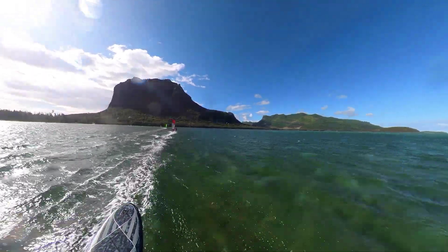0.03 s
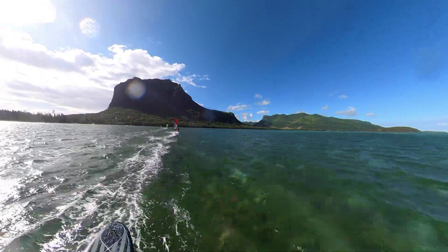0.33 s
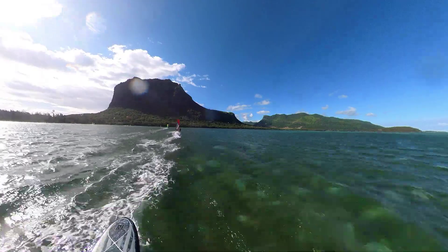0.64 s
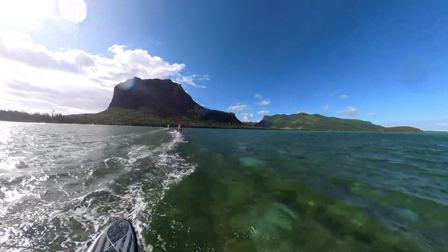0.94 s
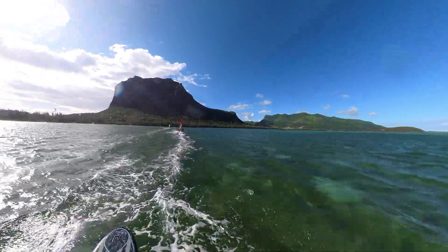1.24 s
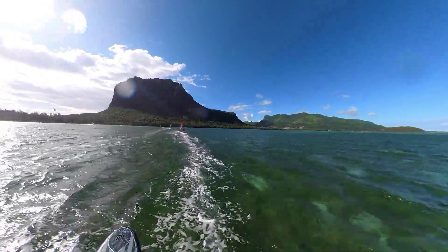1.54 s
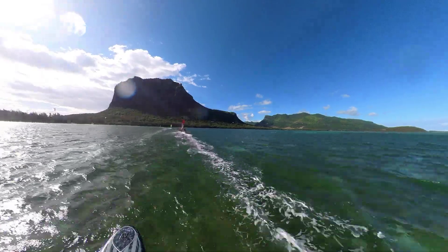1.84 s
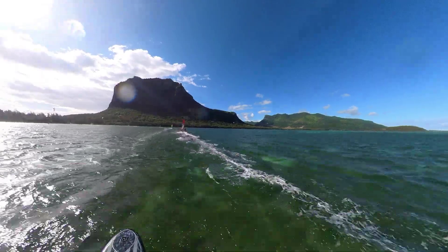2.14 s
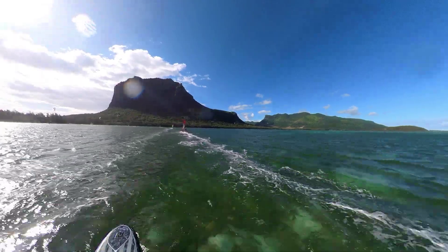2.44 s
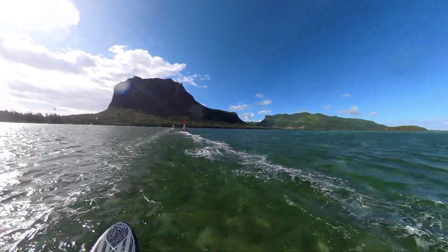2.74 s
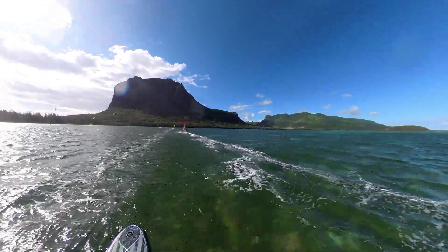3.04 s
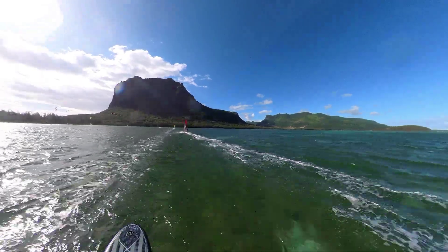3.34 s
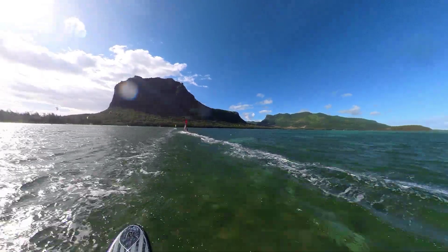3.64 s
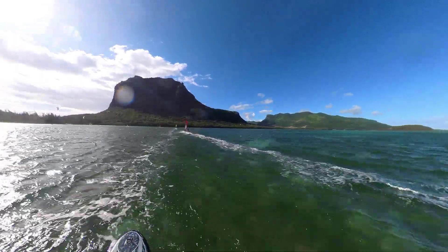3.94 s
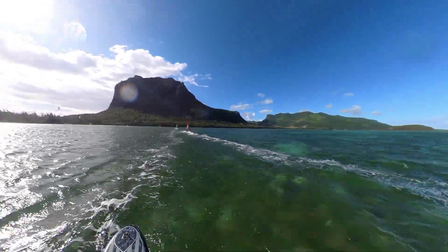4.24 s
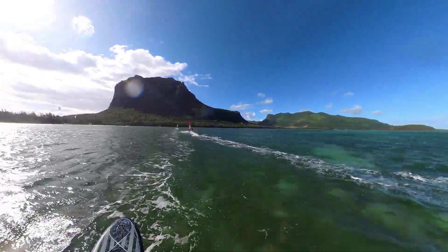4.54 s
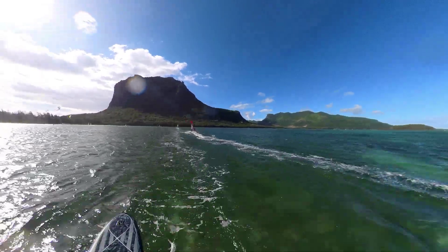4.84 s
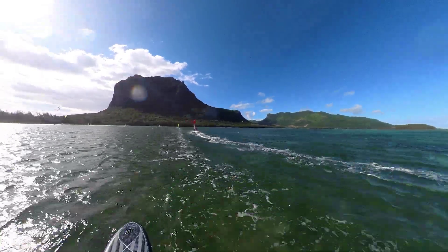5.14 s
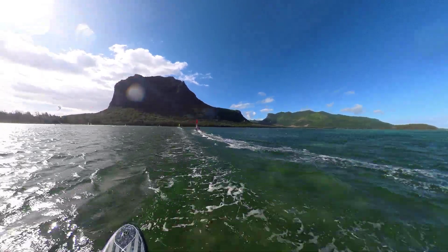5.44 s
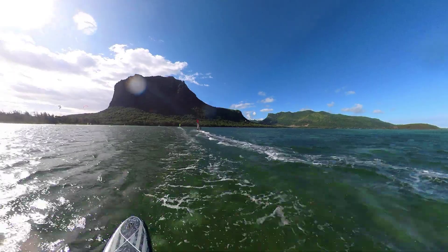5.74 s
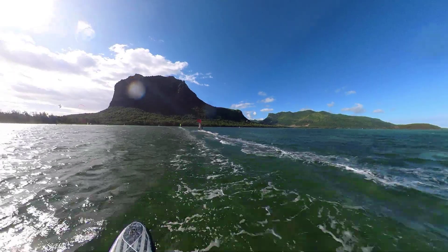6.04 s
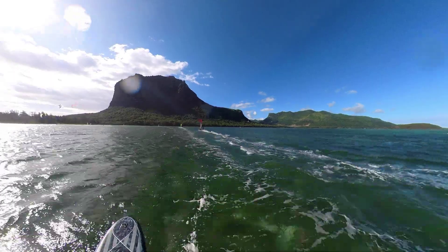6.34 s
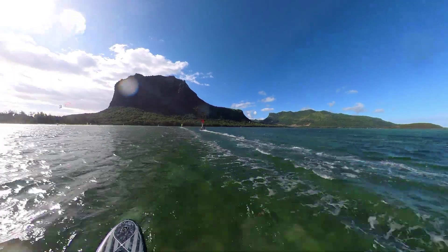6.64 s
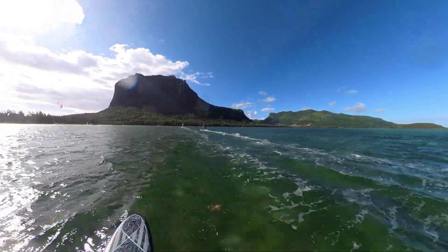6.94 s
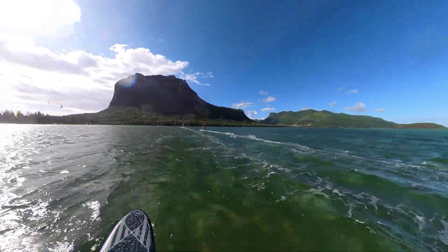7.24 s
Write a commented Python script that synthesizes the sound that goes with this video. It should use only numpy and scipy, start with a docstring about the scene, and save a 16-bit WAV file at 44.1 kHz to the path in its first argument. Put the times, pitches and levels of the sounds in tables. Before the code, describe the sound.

A board speeds across a choppy lagoon, heard from a small waterproof camera riding with it. Turbulent wind rumbles on the microphone throughout and water rushes along the edges. Chop slaps and thumps the board several times a second in short, rough bursts. Whenever the board skips, the rush dips briefly and a deep throb comes through. Faint spray sizzles and ticks behind it, muffled and without echo.

```python
"""Board planing over a choppy lagoon.

Heard from a small waterproof camera riding with it. Turbulent wind rumbles on the microphone and
water rushes along the rails. Chop thumps, slaps and smacks the board in short rough bursts. When
the board skips, the rush drops away and a deep throb shakes the camera. Spray sizzles, spurts and
ticks behind it all, muffled by the sealed port."""
import sys
import numpy as np
from scipy import signal
from scipy.fft import rfft, irfft, next_fast_len
from scipy.io import wavfile
from scipy.ndimage import uniform_filter1d, map_coordinates

SR = 44100
rng = np.random.default_rng(int(sys.argv[2]) if len(sys.argv) > 2 else 0)


def unload_audio(sound):
    """Save the sound as a 16-bit wav file, at the path given as the first command line argument."""
    columns = np.transpose(np.atleast_2d(sound))
    # keep every value between -1 and 1, then stretch to whole-number steps
    steps = np.round(np.clip(columns, -1, 1) * 32767)
    wavfile.write(sys.argv[1], SR, steps.astype(np.int16))


N = 321930
TIME_S = np.arange(N) / SR

# Noise spectra. Each row: frequency in Hz, relative gain in dB.
RUMBLE_SPECTRUM = [(15, -42.5), (27, -10.5), (42, 4.5), (60, 3.5), (100, 2.5), (160, -1), (220, -10),
                   (400, -42)]
KNOCK_SPECTRUM = [(60, -25.5), (120, -11), (190, 9), (270, -2), (400, -7.5), (900, -44.5)]
FLUTTER_SPECTRUM = [(100, -24.5), (190, 2.5), (260, 2), (400, -6.5), (500, -13), (610, -14), (720, -24),
                    (900, -24), (1500, -56.5)]
RUSH_SPECTRUM = [(200, 2), (480, 10), (850, 8.5), (1250, 3), (1550, -2), (2000, -4.5), (3000, -25),
                 (4500, -17.5), (8000, -13.5)]
SPRAY_SPECTRUM = [(1000, -5), (2200, 0), (3500, -4), (5000, 3), (7300, 3), (9000, 3), (12000, 1.5)]
SPLASH_SPECTRUM = [(250, -7), (450, 12.5), (750, 14), (1000, 5.5), (1300, 2), (2000, -2), (3000, -12),
                   (4500, -9.5), (8000, -38)]
TICK_SPECTRUM = [(1000, -17), (2600, -8), (4000, -4.5), (6300, 3), (9000, 5.5), (12000, -5.5)]
SWISH_SPECTRUM = [(500, -21.5), (1400, 6.5), (2400, -0.5), (3300, -5.5), (4500, -0.5), (7000, -17.5)]
# Wind rumble on the microphone. Each row: time in seconds, base level in dB.
RUMBLE_LEVELS = [(0, -22.5), (0.9, -23.5), (1.15, -20), (1.45, -22.5), (1.7, -20), (2.3, -25), (2.7, -20.5),
                 (3.25, -26.5), (3.6, -21), (4.5, -24.5), (4.85, -21.5), (5.05, -21.5), (5.6, -25),
                 (6.1, -22.5), (7.3, -23)]
# Spray off the board. Each row: time in seconds, base level in dB.
SPRAY_LEVELS = [(0, -55), (0.38, -51), (0.57, -41.5), (.76, -45.5), (1.07, -47), (1.28, -51), (1.95, -44),
                (2.3, -46.5), (2.7, -43), (3, -49.5), (3.37, -42), (3.5, -54), (3.87, -42.5), (4.2, -48),
                (4.6, -41.5), (5.05, -45), (5.22, -43.5), (5.28, -45.5), (5.5, -42.5), (5.65, -44),
                (5.85, -44), (6.17, -48.5), (6.55, -44), (6.8, -47), (7.05, -45.5), (7.3, -46.5)]
# Board running light. Each row: centre and half-width in seconds, wind drop and water drop in dB.
LIGHT_RUNS = [(.09, 0.044, 4.5, 6.5), (.33, 0.019, 0.5, 3), (.745, 0.036, -0.5, 2.5), (1.32, .05, 3.5, 4.5),
              (1.51, 0.13, 8, 7.5), (1.63, 0.028, -3.5, 4), (1.8, 0.025, 2.5, 5), (1.93, 0.1, 3, 6.5),
              (2.21, 0.072, 9, 10), (2.48, 0.077, 7, 6.5), (2.8, 0.04, 7.5, 4.5), (2.94, 0.024, 8.5, 7),
              (3.06, 0.037, -1, 12), (3.15, 0.021, 0, 7), (3.33, .04, 3.5, 5), (3.6, 0.071, 4.5, 7.5),
              (3.73, 0.025, 4, 10.5), (3.94, 0.03, 5, 9), (4.18, 0.047, 7.5, 4), (4.3, 0.037, 1.5, 8),
              (4.769, 0.075, 2, 5.5), (5, 0.052, 15.5, 11.5), (5.08, 0.042, 11.5, 10),
              (5.32, 0.1, 6.5, 4.5), (5.73, 0.078, 9.5, 5.5), (5.98, 0.03, 0, 7), (6.45, 0.059, 5.5, 3),
              (6.78, 0.11, 2, 3.5), (7.27, 0.062, 0.5, 1.5)]
# Hull hitting a wave. Each row: time in seconds, pitch in Hz, peak in dB.
HULL_THUMPS = [(0.046, 170, -8.5), (.17, 175, -12), (1.1, 197, -16.5), (2.33, 221, -12), (3.451, 186, -7.5),
               (3.544, 200, -16), (3.598, 170, -11), (2.1, 200, -17.5), (3.799, 171, -22.5),
               (4.386, 192, -13.5), (4.647, 196, -9.5), (5.176, 200, -11), (6.945, 196, -11)]
# Chop on the board. Each row: crest and length in seconds, pitch in Hz, body and splash in dB.
CHOP_SLAPS = [(0.055, .02, 192, -21, -51), (0.151, 0.014, 190, -21.5, -38),
              (0.201, 0.0084, 273, -20.5, -31.5), (0.285, 0.012, 450, -25.5, -30),
              (0.366, 0.008, 380, -22.5, -32), (0.421, 0.024, 288, -32, -33.5),
              (0.491, .02, 470, -31.5, -36), (0.518, 0.038, 290, -40, -36), (0.6, 0.064, 330, -29, -31.5),
              (0.691, 0.012, 410, -21, -40), (0.79, 0.021, 400, -27.5, -29.5),
              (0.961, 0.029, 215, -23.5, -29.5), (1.055, 0.049, 247, -27, -42),
              (1.077, 0.0082, 475, -27, -44), (1.167, 0.045, 288, -25.5, -40.5),
              (1.219, 0.024, 328, -27.5, -31.5), (1.405, 0.048, 262, -21.5, -33.5),
              (1.742, 0.036, 207, -23, -30), (1.852, 0.026, 433, -27, -34.5),
              (1.938, 0.017, 300, -33, -32.5), (2, 0.0084, 600, -26, -33),
              (2.013, 0.014, 242, -19.5, -27.5), (2.072, 0.027, 244, -22.5, -41),
              (2.097, 0.016, 304, -19, -28.5), (2.26, 0.018, 298, -26.5, -38.5),
              (2.319, 0.016, 239, -17, -32), (2.346, 0.022, 241, -17, -31),
              (2.404, 0.011, 250, -19.5, -34.5), (2.552, 0.023, 448, -43, -31.5),
              (2.617, 0.015, 224, -21.5, -35), (2.651, 0.021, 360, -25.5, -32.5),
              (2.692, 0.011, 530, -22, -27), (2.869, 0.014, 408, -22, -26), (2.893, 0.023, 430, -30, -32.5),
              (2.981, 0.008, 517, -29.5, -40), (2.998, 0.018, 200, -28, -33),
              (3.099, 0.008, 270, -24.5, -31.5), (3.118, 0.005, 284, -21, -38),
              (3.215, 0.01, 523, -18.5, -32), (3.248, 0.031, 283, -23, -30.5),
              (3.453, .012, 260, -21.5, -35.5), (3.496, 0.026, 420, -38, -42.5),
              (3.538, .013, 225, -23.5, -35.5), (3.6, 0.02, 211, -28, -36), (3.671, 0.018, 258, -19, -32),
              (3.786, 0.023, 217, -19, -48), (3.846, 0.0093, 302, -16, -35),
              (3.866, 0.035, 313, -29.5, -29.5), (4.015, 0.023, 206, -27.5, -39),
              (4.091, 0.014, 495, -19, -38.5), (4.122, 0.032, 450, -43, -36.5),
              (4.219, 0.014, 218, -28.5, -31), (4.382, 0.011, 260, -19.5, -31.5),
              (4.395, 0.026, 340, -19.5, -34), (4.455, .014, 258, -33, -30.5),
              (4.647, 0.015, 277, -13, -30), (4.675, 0.024, 219, -38, -34), (4.864, 0.034, 195, -19.5, -32),
              (4.917, 0.0095, 453, -17, -37), (4.938, 0.013, 213, -15.5, -31.5),
              (5.17, 0.011, 436, -17.5, -25.5), (5.194, 0.023, 242, -30, -33),
              (5.238, 0.022, 355, -39, -36.5), (5.304, 0.017, 450, -36, -35), (5.387, .029, 326, -28, -31),
              (5.457, 0.034, 480, -32, -30.5), (5.563, 0.016, 232, -33, -30), (5.64, 0.024, 292, -17, -32),
              (5.684, 0.019, 250, -45, -32.5), (5.844, 0.0068, 326, -20, -39),
              (5.879, 0.023, 450, -31, -38), (5.913, 0.019, 400, -21, -35),
              (6.004, 0.0073, 268, -26.5, -32.5), (6.031, 0.019, 388, -16.5, -30.5),
              (6.062, .02, 416, -43, -31), (6.174, 0.037, 300, -27, -39), (6.277, .025, 279, -27.5, -37.5),
              (6.33, 0.0062, 450, -25.5, -41), (6.347, 0.04, 288, -21.5, -33),
              (6.371, 0.0083, 495, -18.5, -34), (6.504, 0.0098, 300, -43, -37),
              (6.603, 0.024, 251, -19.5, -36), (6.653, 0.014, 390, -21, -31.5),
              (6.67, 0.028, 292, -22, -29.5), (6.946, 0.014, 258, -20.5, -29.5),
              (6.967, 0.012, 404, -34.5, -32.5), (7.021, 0.016, 227, -23, -34.5),
              (7.113, 0.026, 298, -26, -27), (7.162, 0.03, 325, -27.5, -34),
              (7.211, 0.013, 240, -24.5, -35)]
# Skips off the chop. Each row: crest of the throb in seconds, peak in dB.
BOARD_SKIPS = [(0.079, -22), (.335, -24), (0.714, -22), (1.28, -15.5), (1.499, -15.5), (2.159, -17.5),
               (2.438, -21.5), (2.778, -19.5), (2.927, -17.5), (3.116, -33.5), (3.601, -31), (3.909, -31),
               (4.154, -18), (4.256, -19.5), (4.479, -23.5), (4.738, -22.5), (4.986, -17.5), (5.222, -16.5),
               (5.713, -16.5), (6.134, -20), (6.416, -19.5), (6.742, -16.5), (7.206, -26)]
# Single drops on the camera. Each row: time in seconds, level at the crest in dB.
DROP_TICKS = [(.099, -31), (.344, -36), (.46, -36), (.532, -33), (0.839, -29.5), (1.256, -44), (1.411, -34),
              (1.832, -32), (2.403, -35), (2.567, -28), (2.874, -30), (3.005, -28.5), (3.118, -40),
              (3.872, -36), (4.145, -36), (4.564, -25.5), (5.021, -35), (5.101, -25.5), (5.171, -33),
              (5.318, -33), (5.689, -36), (6.867, -34), (7.099, -28), (7.126, -30), (7.229, -37),
              (7.267, -29.5)]
# Flings of spray. Each row: centre and half-width in seconds, swish and fizz in dB.
SPRAY_SPURTS = [(.211, 0.012, -35.5, -39), (.252, 0.0043, -41, -45), (.425, 0.0068, -40, -41),
                (.533, 0.0061, -42, -36), (.619, 0.0082, -40, -37), (.668, 0.012, -42.5, -37),
                (0.842, 0.0096, -41, -39), (.94, 0.027, -52, -36.5), (1.041, 0.014, -42, -38),
                (1.075, 0.022, -38, -33), (1.478, 0.021, -45.5, -47), (1.55, 0.068, -55, -49),
                (2.011, 0.011, -51, -33.5), (2.566, 0.011, -43, -34.5), (2.622, 0.0089, -47, -50),
                (2.692, 0.023, -42, -37), (2.755, 0.0093, -39.5, -41), (2.876, 0.0074, -44, -39),
                (3.207, 0.0019, -29, -40), (3.275, 0.016, -40.5, -46), (3.873, 0.0099, -40, -39),
                (4.383, 0.03, -42, -34.5), (4.585, 0.035, -42.5, -41), (4.684, 0.017, -33.5, -33.5),
                (4.785, .005, -56, -36), (4.88, 0.011, -50, -36.5), (5.005, 0.016, -50, -52),
                (5.099, .005, -46, -39), (5.171, 0.0097, -34.5, -34.5), (5.465, 0.014, -53, -37),
                (5.69, .004, -45, -45), (6.055, 0.017, -46, -35), (6.385, 0.017, -40, -45),
                (6.575, 0.018, -46, -39), (6.61, 0.01, -37.5, -37), (6.643, 0.0099, -45, -36),
                (6.675, 0.036, -40, -41), (6.865, 0.0091, -36, -33), (7.225, 0.0083, -42, -36)]
# Smacks of flat water. Each row: time in seconds, centre pitch in Hz, first crack's peak in dB.
WATER_SMACKS = [(0.286, 1236, -25), (.532, 1800, -26), (.62, 1600, -26.5), (.693, 1000, -25),
                (1.223, 1155, -19), (1.859, 1000, -26.5), (2.002, 800, -22), (2.013, 1200, -21),
                (2.099, 1000, -31.5), (2.327, 980, -18.5), (2.565, 1080, -20), (2.686, 1230, -18),
                (2.694, 1100, -28), (2.872, 1150, -20), (3.003, 1200, -25), (3.103, 1180, -16.5),
                (3.211, 1100, -30), (3.861, 1420, -18.5), (4.094, 850, -26.5), (4.386, 1206, -21),
                (4.397, 1125, -19.5), (4.452, 1124, -22), (4.883, 1020, -21), (4.924, 1193, -13),
                (5.172, 1197, -31), (5.474, 1027, -24), (6.035, 1303, -18), (6.349, 1400, -23),
                (6.656, 1100, -22), (6.667, 1410, -20), (7.114, 1100, -18)]
# Camera housing resonances. Each row: frequency in Hz, bandwidth in Hz, gain in dB.
HOUSING_MODES = [(253, 55, -16), (505.5, 91, -4), (713, 140, -9.5), (1320, 260, -16)]
# Treble loss through the sealed port. Each row: frequency in Hz, gain in dB.
PORT_RESPONSE = [(10, -0.5), (2600, -4.5), (3300, -10), (3900, -19), (4400, -29.5), (4850, -32),
                 (5400, -27), (6200, -15), (7000, -10), (7700, -11), (8400, -20), (9000, -34)]


def undb(db):
    """Decibels to gain."""
    return 10 ** (np.asarray(db) / 20)


def unit(x):
    """Scale to rms 1."""
    return x / np.sqrt(np.mean(x ** 2) + 1e-18)


def colour(x, spectrum):
    """Filter by (Hz, dB) points."""
    hz, db = np.transpose(spectrum)
    size = next_fast_len(len(x))
    bins_hz = np.maximum(np.fft.rfftfreq(size, 1 / SR), 1)
    gain = undb(np.interp(np.log(bins_hz), np.log(hz), db))
    return irfft(rfft(x, size) * gain, size)[:len(x)]


def noise(spectrum):
    """Coloured noise, rms 1."""
    return unit(colour(rng.standard_normal(N), spectrum))


def walk(rate_hz):
    """Smooth random drift, rms 1."""
    knots = rng.standard_normal(N // 16)
    return unit(map_coordinates(knots, [TIME_S * rate_hz], order=2, mode="wrap"))


def steady(x, span_s):
    """Level out swells slower than span_s."""
    size = max(int(span_s * SR), 1)
    power = uniform_filter1d(uniform_filter1d(x ** 2, size), size)
    return x / np.sqrt(power + 1e-9)


def impacts(per_s):
    """Impulses of random time and size."""
    return (rng.random(N) < per_s / SR) * rng.standard_normal(N)


def spatter(spectrum, per_s):
    """Coloured patter of drops, rms 1."""
    return unit(colour(impacts(per_s), spectrum))


def curve(points):
    """Join (seconds, value) points linearly."""
    return np.interp(TIME_S, *np.transpose(points))


def bump(at_s, half_width_s):
    """Gaussian swell, height 1."""
    out = np.zeros(N)
    near = slice(*np.searchsorted(TIME_S, [at_s - 4 * half_width_s, at_s + 4 * half_width_s]))
    out[near] = np.exp(-((TIME_S[near] - at_s) / half_width_s) ** 2)
    return out


def window(at_s, before_s, after_s):
    """Slice around an event, and its samples' ages."""
    near = slice(max(int((at_s - before_s) * SR), 0), int((at_s + after_s) * SR))
    return near, TIME_S[near] - at_s


def strike(at_s, rise_s, fade_s):
    """Slice, ages and envelope of a blow: Gaussian rise, exponential decay."""
    near, age_s = window(at_s, 0.02, 0.06)
    return near, age_s, np.exp(-np.where(age_s < 0, (age_s / rise_s) ** 2 / 2, age_s / fade_s))


def lulls():
    """Drop of wind and of water, in dB, while the board runs light."""
    wind_db = sum(db * bump(at_s, half_width_s) for at_s, half_width_s, db, _ in LIGHT_RUNS)
    water_db = sum(db * bump(at_s, half_width_s) for at_s, half_width_s, _, db in LIGHT_RUNS)
    return wind_db, water_db


def wind(lull_db, flutter_base_db=-27.5, knock_relative_db=-7, rumble_lull_share=0.55):
    """Large eddies rumble, single ones knock, small ones flutter. All surge, and sink in a lull."""
    puffs = walk(rate_hz=65)
    rumble_db = curve(RUMBLE_LEVELS) + 1.37 * walk(rate_hz=13) - rumble_lull_share * lull_db
    rumble = steady(noise(RUMBLE_SPECTRUM) * undb(1.4 * puffs), span_s=0.1)
    knocks = unit(colour(np.tanh(impacts(per_s=45)), KNOCK_SPECTRUM))
    flutter = steady(noise(FLUTTER_SPECTRUM) * undb(2.2 * puffs + 2.1 * walk(rate_hz=310)), span_s=0.02)
    flutter_db = flutter_base_db + 1.83 * walk(rate_hz=19) - lull_db
    return rumble * undb(rumble_db) + (flutter + undb(knock_relative_db) * knocks) * undb(flutter_db)


def rush(lull_db, base_db=-37):
    """Water tears along the rails, thinner in a lull."""
    flow = noise(RUSH_SPECTRUM)
    rough_db = 2.0 * walk(rate_hz=58) + 1.4 * walk(rate_hz=310)
    return steady(flow * undb(rough_db), span_s=0.052) * undb(base_db - lull_db)


def spray(lull_db, mist_gain_db=2.0, patter_gain_db=-0.5, lull_share=0.41, thrown_relative_db=-14):
    """Mist hisses, uneven droplets patter. Each slap throws up more; a lull thins it."""
    running = undb(curve(SPRAY_LEVELS) - lull_share * lull_db)
    thrown = sum(undb(splash_db + thrown_relative_db) * bump(at_s + length_s / 4, half_width_s=0.012)
                 for at_s, length_s, _, _, splash_db in CHOP_SLAPS)
    mist = noise(SPRAY_SPECTRUM) * undb(1.3 * walk(rate_hz=63) + 1.6 * walk(rate_hz=180))
    droplets = impacts(per_s=900) * undb(3 * walk(rate_hz=400))
    patter = steady(colour(droplets, SPRAY_SPECTRUM), span_s=0.049)
    return np.hypot(running, thrown) * (undb(mist_gain_db) * mist + undb(patter_gain_db) * patter)


def thumps(sag_per_s=6):
    """The hull swings two or three cycles, sagging in pitch as it settles into the water."""
    out = np.zeros(N)
    for (at_s, hz, db), phase in zip(HULL_THUMPS, rng.random(len(HULL_THUMPS))):
        near, age_s, envelope = strike(at_s, rise_s=0.0019, fade_s=0.0055)
        cycles = hz * age_s * (1 - sag_per_s * age_s / 2) + phase
        out[near] += undb(db) * envelope * np.sin(2 * np.pi * cycles)
    return out


def slaps(pocket_q=1.78, rise_share=0.23, fade_share=0.68, crack_gain=0.18, crack_s=0.00098):
    """Chop traps an air pocket that rings briefly, under a torn splash that cracks at the crest."""
    out = np.zeros(N)
    water = steady(spatter(SPLASH_SPECTRUM, per_s=2400), span_s=0.0057) * undb(1.1 * walk(rate_hz=960))
    push = rng.standard_normal(N)
    for at_s, length_s, hz, body_db, splash_db in CHOP_SLAPS:
        near, age_s = window(at_s, 2 * length_s, 4 * length_s)
        lengths = np.abs(age_s) / length_s
        decay = np.where(age_s < 0, (lengths / rise_share) ** 2, (lengths / fade_share) ** 1.88)
        envelope = np.exp(-decay / 2)
        pocket = signal.iirpeak(hz, pocket_q, fs=SR)
        ring = steady(signal.lfilter(*pocket, signal.lfilter(*pocket, push[near])), span_s=0.008)
        crack = 1 + crack_gain * np.exp(-np.abs(age_s) / crack_s)
        body = unit(ring * envelope) * undb(body_db)
        splash = unit(water[near] * envelope * crack) * undb(splash_db)
        out[near] += np.sqrt(length_s * SR / len(age_s)) * (body + splash)  # rms over length_s
    return out


def throbs(pitch_hz=43.6, rise_s=0.054, fade_s=0.063):
    """Each skip sets off a few slow, uneven pressure swings that swell and die."""
    out = np.zeros(N)
    wobble_s = np.cumsum(0.0927 * walk(rate_hz=40)) / SR
    for (at_s, db), phase in zip(BOARD_SKIPS, rng.random(len(BOARD_SKIPS))):
        near, age_s = window(at_s, 0.1, 0.3)
        envelope = np.exp(-np.where(age_s < 0, (age_s / rise_s) ** 2 / 2, (age_s / fade_s) ** 2))
        cycles = pitch_hz * (age_s + wobble_s[near]) + phase
        out[near] += undb(db) * envelope * np.sin(2 * np.pi * cycles)
    return out


def ticks():
    """Single drops burst crisply on the housing."""
    gain = np.zeros(N)
    for at_s, db in DROP_TICKS:
        near, _, envelope = strike(at_s, rise_s=0.0003, fade_s=0.0022)
        gain[near] += undb(db) * envelope
    return gain * steady(noise(TICK_SPECTRUM), span_s=0.001)


def spurts():
    """Flung spray: a ragged swish of water, a bright fizz of drops on the camera."""
    swish = spatter(SWISH_SPECTRUM, per_s=1100)
    fizz = unit(noise(SPRAY_SPECTRUM) * undb(walk(rate_hz=780)))
    return sum(bump(at_s, half_width_s) * (undb(swish_db) * swish + undb(fizz_db) * fizz)
               for at_s, half_width_s, swish_db, fizz_db in SPRAY_SPURTS)


def smacks(crack_count=4, gap_s=0.0034, scatter_octaves=0.14, step_db=-5.0):
    """A small air pocket tears shut in a run of one-cycle cracks, each weaker than the last."""
    out = np.zeros(N)
    for at_s, centre_hz, db in WATER_SMACKS:
        for k, (jitter, detune, phase) in enumerate(rng.uniform(-1, 1, (crack_count, 3))):
            crack_at_s = at_s + gap_s * (k - 0.5 + jitter / 3)
            near, age_s, envelope = strike(crack_at_s, rise_s=0.00012, fade_s=0.0008)
            hz = centre_hz * 2 ** (scatter_octaves * detune)
            out[near] += undb(db + k * step_db) * envelope * np.sin(2 * np.pi * (hz * age_s + phase))
    return out


def scene():
    """One microphone in the open, no echo."""
    wind_lull_db, water_lull_db = lulls()
    board = slaps() + smacks() + thumps() + throbs()
    flow = wind(wind_lull_db) + rush(water_lull_db)
    return (board + flow + spray(water_lull_db) + spurts() + ticks())[None]


def record(dry, ceiling=0.97, cutoff_hz=9000):
    """The housing rings, peaks round off, the port muffles the treble, the top is cut."""
    ringing = sum(undb(db) * signal.lfilter(*signal.iirpeak(hz, hz / width_hz, fs=SR), dry[0])
                  for hz, width_hz, db in HOUSING_MODES)
    rounded = ceiling * np.tanh((dry[0] + ringing) / ceiling)
    lowpass = signal.ellip(8, 0.2, 70, cutoff_hz, fs=SR, output="sos")
    return signal.sosfilt(lowpass, colour(rounded, PORT_RESPONSE))[None]


dry = scene()
out = record(dry)
unload_audio(out)
```